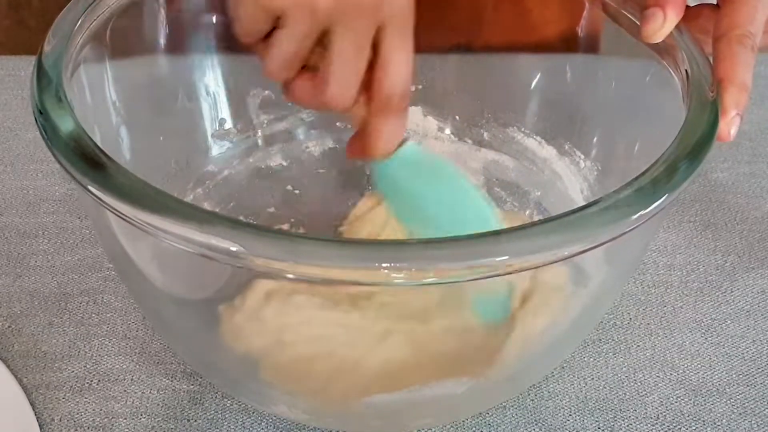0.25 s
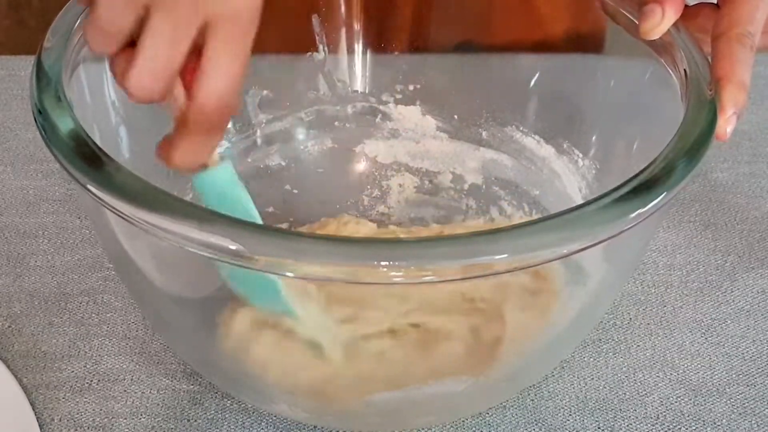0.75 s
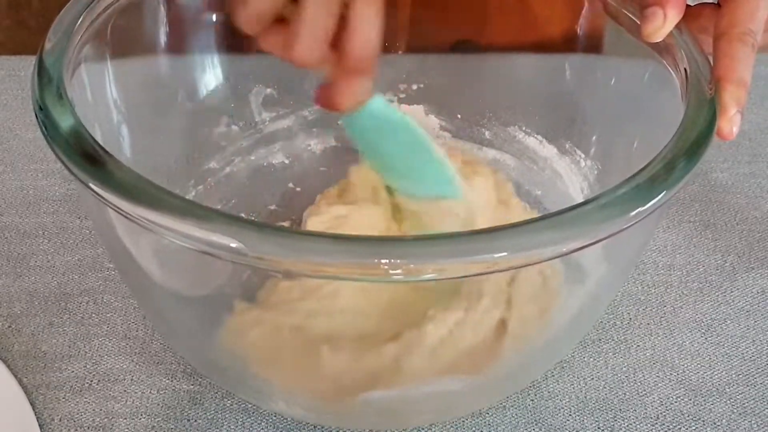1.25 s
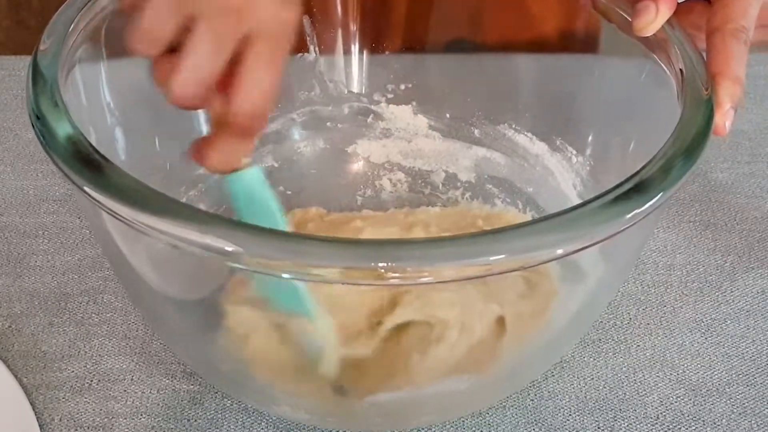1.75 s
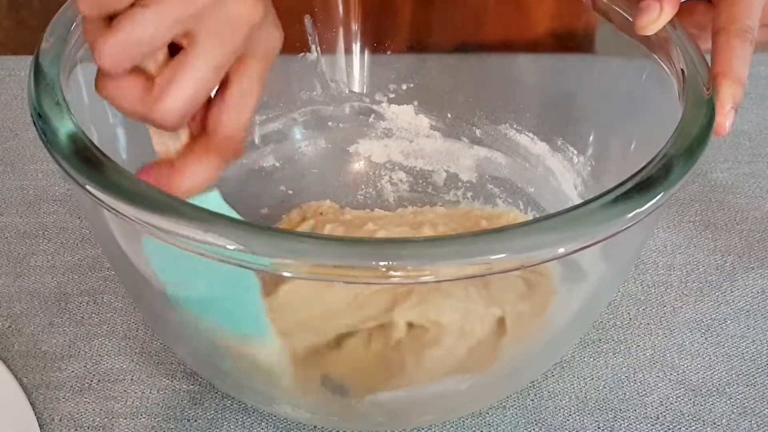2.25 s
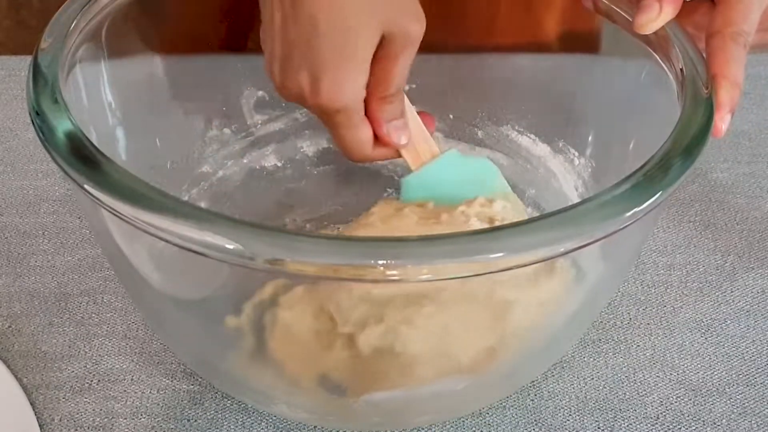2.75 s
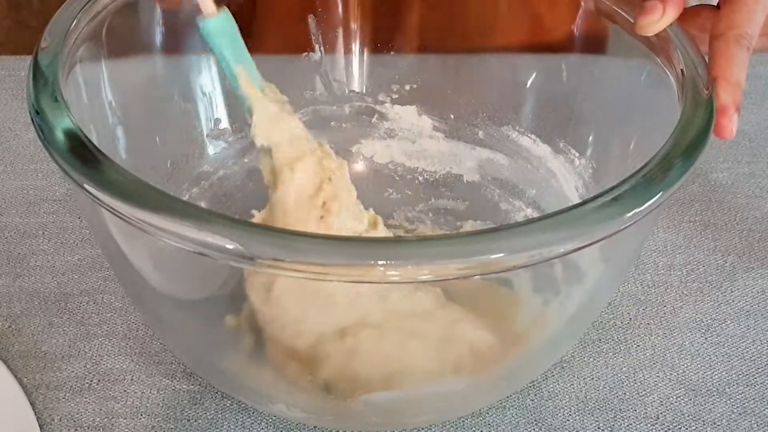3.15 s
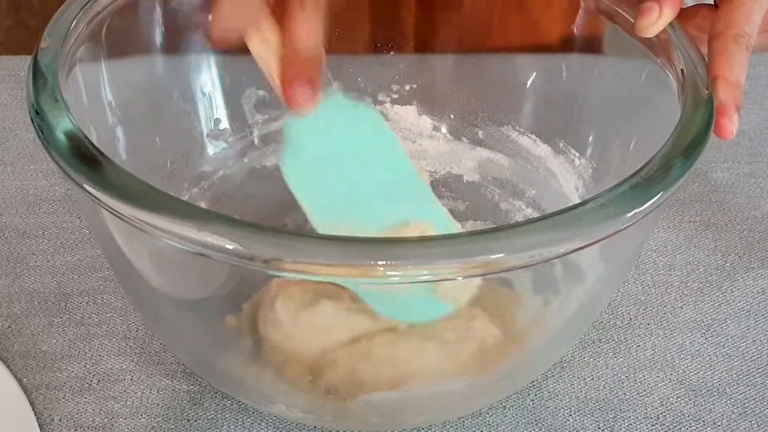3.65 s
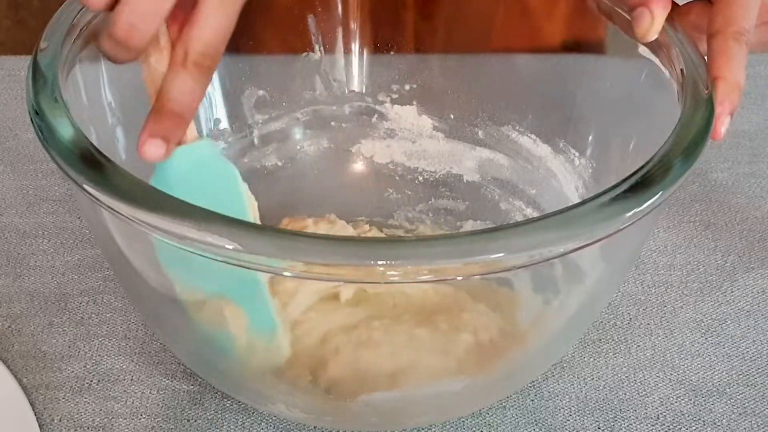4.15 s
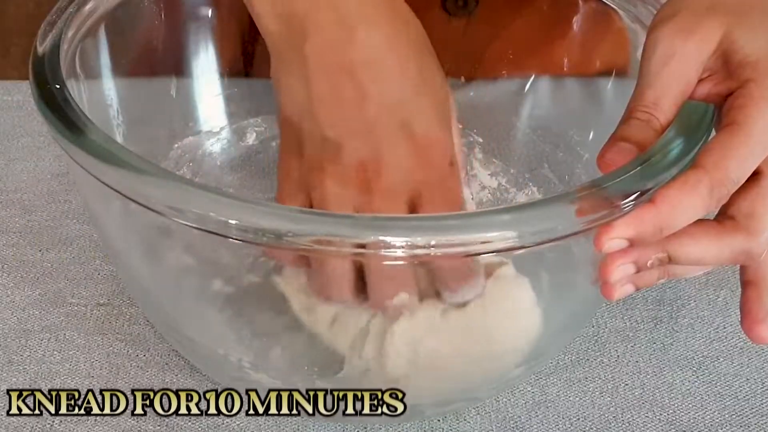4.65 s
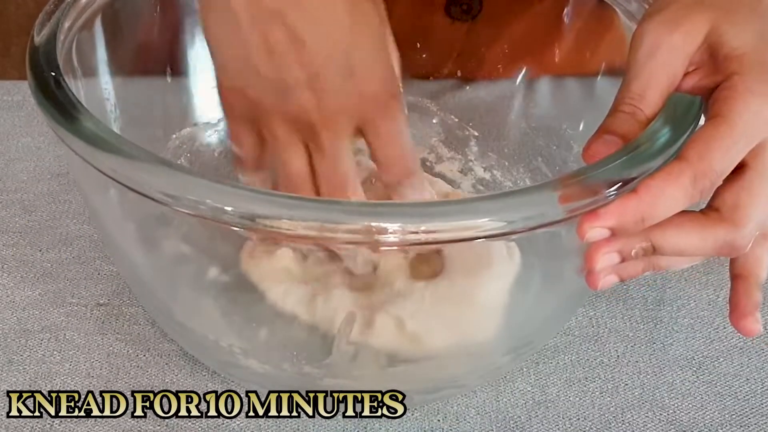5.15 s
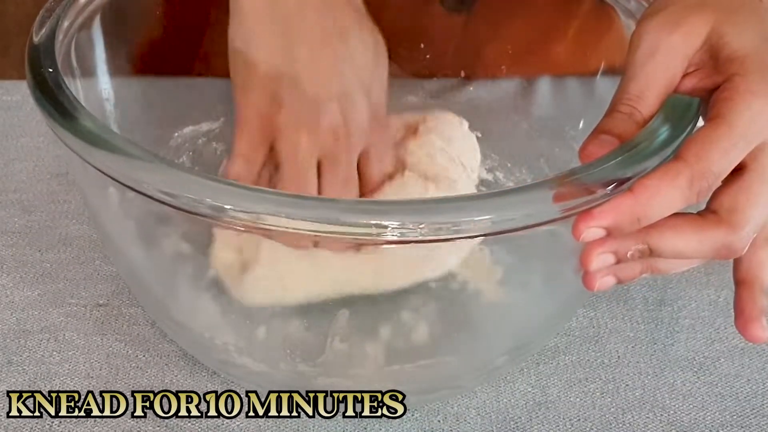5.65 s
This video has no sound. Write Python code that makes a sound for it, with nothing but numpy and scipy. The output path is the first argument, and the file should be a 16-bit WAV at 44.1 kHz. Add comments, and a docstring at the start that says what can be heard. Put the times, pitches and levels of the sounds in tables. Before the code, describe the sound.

Sticky dough crackles and snaps under a spatula in a glass bowl, with dull thumps, then a dry click and squelching hand kneading.

```python
"""Sticky dough is worked in a glass bowl on a cloth-covered table, first with a spatula, then by hand.
It crackles in clumps of tiny ruptures as it peels off the glass, squelches when pressed, and larger pockets snap.
Pushes thump the bowl and set the table ringing; one short, dry, full-band click comes just before the hand work.
The spatula taps through dough and twice touches bare glass, ringing the bowl's modes.
A small kitchen answers with decaying noise, over a quiet rumble and hiss."""
import sys
import numpy as np
from scipy import signal
from scipy.fft import rfft, irfft, next_fast_len
from scipy.io import wavfile

SR = 44100
rng = np.random.default_rng(int(sys.argv[2]) if len(sys.argv) > 2 else 0)


def store_pcm(level_fs):
    """Save levels as 16-bit WAV."""
    pcm = np.round(np.clip(level_fs, -1, 1) * 32767).astype(np.int16)
    wavfile.write(sys.argv[1], SR, np.atleast_2d(pcm).T)


N = 260190  # length in samples

# Colour of the room's rumble and hiss. Each row: frequency in Hz, relative density in dB per Hz.
BACKGROUND_COLOUR = [(25, -7.5), (40, -6), (55, 2.5), (85, 0.5), (135, -5), (180, -14), (300, -11.5),
                     (480, -16.5), (700, -21), (1600, -26.5), (3400, -30), (8000, -31.5), (16000, -31.5)]
BACKGROUND_DB = -50.5  # rms level before the microphone
# How alike left and right are in diffuse sound. Each row: frequency in Hz, correlation from -1 to 1.
STEREO_LIKENESS = [(50, 0.25), (150, 0.48), (300, 0.5), (600, 0.21), (1500, 0.09), (4000, 0), (16000, 0)]
# Stereo balance of diffuse sound. Each row: frequency in Hz, left against right in dB.
STEREO_BALANCE = [(50, -3), (150, -8.5), (400, -4), (1500, -1.5), (8000, -1), (14000, 0)]
KITCHEN_T60_S = 0.44
CUTOFF_HZ = 15900  # top of the recorded band

# Bare spatula on the glass. Each row: start in seconds, impulse level in dB, softness of contact in seconds.
BARE_KNOCKS = [(2.812, -39, 0.00005), (2.918, -33, 0.00049)]
# Glass bowl, damped by dough and hand. Each row: frequency in Hz, gain in dB, t60 in seconds.
BOWL_MODES = [(340, -7, 0.23), (414, 1.5, 0.31), (446, -4, 0.21), (497, -13, 0.22), (1107, -8, 0.66),
              (1550, -23, 0.19), (2110, -14, 0.14), (2840, -14, 0.25), (6020, -1, 0.11), (7930, -10, .15),
              (11800, -7, 0.1)]
DAMPED_S, DAMPING_DB_PER_S = 2.905, 500  # the blade settles on the glass and smothers its ring

# Spatula meeting the glass through dough. Each row: start in seconds, strength in dB.
CUSHIONED_TAPS = [(0.015, -23), (0.595, -26), (0.625, -33), (1.535, -22.5), (1.588, -26.5), (2.355, -26),
                  (2.814, -24.5), (2.919, -29.5), (3.731, -27.5)]
# Colour of a cushioned tap. Each row: frequency in Hz, relative density in dB per Hz.
TAP_COLOUR = [(200, -21.5), (450, 2.5), (720, -18), (990, -4.5), (1250, -14), (3000, -34)]

CLICK_S, CLICK_DB = 4.2152, -13  # the dry click before the hand work: time, impulse level
# Colour of the dry click. Each row: frequency in Hz, relative density in dB per Hz.
CLICK_COLOUR = [(150, 7), (500, 4), (1500, -7), (4000, -15), (9000, -22), (16000, -16)]

# Air pockets and threads of dough snapping. Each row: start in seconds, bright tick in dB, low pop in dB.
DOUGH_SNAPS = [(0.1334, -17.5, -29), (0.594, -37, -48), (0.6261, -27, -32), (0.6478, -21.5, -34),
               (0.963, -23, -34), (1.5362, -26.5, -24), (1.9126, -25, -41), (2.2598, -29.5, -36),
               (2.2915, -19, -27), (2.354, -13, -19.5), (2.4874, -15, -26), (2.804, -24, -27),
               (2.9024, -21, -46)]
# Colour of a snap's tick and fizz. Each row: frequency in Hz, relative density in dB per Hz.
TICK_COLOUR = [(1500, -18), (3300, -15), (4500, 2), (8000, 4.5), (13000, 7.5), (16000, 2)]
SPRAY_DB = -0.5  # impulse driving the fizz, against the one driving the tick

# Pushes that thump the table. Each row: start in seconds, force in dB, deep boom against the force in dB,
# hardness of contact in dB.
PUSHES = [(0.27, -13.5, -5.5, -2), (0.287, -12.5, -2, -0.5), (0.576, -17.5, -7, -5), (0.593, -10, -9, -1),
          (0.895, -9, -10.5, -2.5), (1.214, -7, -.5, 4.5), (1.534, .5, -4.5, 2), (1.817, -13.5, 6, -13),
          (1.841, 4.5, -27, 0.5), (2.352, -20, -8.5, -1.5), (2.487, -15.5, -19, -3.5),
          (2.741, -28.5, -3, 5), (2.809, -23, -6, 9.5), (4.195, -10.5, -10, 0.5), (4.215, -11.5, -19, 6.5),
          (4.588, -26.5, -9, 0), (4.82, -18, -11.5, -14), (5.422, -22, -2.5, -12)]
# Bowl bouncing on the cloth: frequency in Hz, t60 in seconds, left against right in dB.
CUSHION_MODE = (106.8, 0.053, -3.5)
# Deep boom behind a push: frequency in Hz, t60 in seconds, left against right in dB.
BOOM_MODE = (48, 0.43, -11.5)
# Table under the bowl. Each row: frequency in Hz, gain in dB, t60 in seconds, left against right in dB.
TABLE_MODES = [(61.4, -0.5, 0.21, 3), (129.9, 0.5, 0.31, -7.5), (210.7, -11, 0.22, 8),
               (237.5, -21, 0.43, -9), (292.7, -15, 0.3, -3), (361.3, -15.5, 0.41, 1)]
# Colour of the bowl's dull knock. Each row: frequency in Hz, relative density in dB per Hz.
KNOCK_COLOUR = [(120, 0), (190, -3), (240, 2), (310, -3), (390, -8), (490, -3), (650, -20), (1000, -31.5),
                (2000, -50)]
BOOM_DB, TABLE_DB, KNOCK_DB = -9, -20.5, -9.5  # how strongly a push excites each
KNOCK_FOLLOWS = 0.53  # the dough cushions the knock: dB per dB of force

# Strokes of the spatula. Each row: moment of greatest effort in seconds, peeling crackle in dB,
# share of the finest grains in dB, rise in seconds, release in seconds, wet squelch in dB.
SPATULA_STROKES = [(0.01, -48.5, -1, 0.09, 0.29, -61.5), (0.135, -44.5, -8, 0.0095, 0.093, -60),
                   (0.335, -54, -2.5, 0.11, 0.34, -64.5), (0.65, -53, -1.5, .12, 0.33, -67),
                   (0.975, -52, -1, .13, 0.36, -62.5), (1.293, -49, -2.5, .15, 0.16, -60.5),
                   (1.538, -48.5, -0.5, 0.02, 0.12, -51.5), (1.588, -50, -1.5, 0.14, 0.19, -53.5),
                   (1.78, -58, -4.5, 0.14, 0.052, -61), (1.915, -54, -1.5, 0.23, 0.24, -65),
                   (2.294, -46.5, -.5, 0.0045, 0.17, -56), (2.39, -39.5, -6.5, 0.096, 0.24, -53.5),
                   (2.505, -42.5, -7, .025, 0.37, -51), (2.725, -37.7, -4, 0.097, 0.13, -55.5),
                   (2.852, -48, -1, 0.089, 0.087, -60), (2.906, -44, -2.5, 0.0083, 0.054, -70),
                   (3.07, -49, -2, 0.14, 0.16, -68), (3.42, -66, -1.5, .4, 0.96, -81),
                   (3.775, -56.5, -2, 0.077, .18, -84)]
# Presses and pulls of the hand. Each row: moment of greatest effort in seconds, peeling crackle in dB,
# share of the finest grains in dB, rise in seconds, release in seconds, wet squelch in dB.
HAND_STROKES = [(4.218, -45.5, -1.5, .02, 0.42, -65), (4.325, -38, -4.5, .14, 0.13, -43),
                (4.603, -48, -2, 0.059, 0.096, -65), (4.815, -43, -2, 0.13, 0.2, -54.5),
                (4.902, -44, -4, 0.15, 0.24, -58.5), (5.13, -53, -2, 0.46, 0.29, -63),
                (5.44, -62.5, -3, .15, 0.15, -64), (5.615, -54, -1.5, 0.24, 0.13, -67),
                (5.722, -49.5, -1.5, 0.072, 0.22, -61), (5.89, -55, -2.5, 0.23, .2, -65)]
STROKE_RANGE_DB = 20  # change of crackle level over one rise or release time
RISE_CURVE = 1.32  # above 1: a stroke takes hold quickly and rounds off towards its top
SQUELCH_LAG_S, SQUELCH_SWING = 0.0046, 1.3  # the squelch follows a little later and swings further
# Colour of coarse ruptures. Each row: frequency in Hz, relative density in dB per Hz.
COARSE_COLOUR = [(1500, -14), (2500, -10.5), (3400, -6.5), (4300, -1.5), (5800, -3), (6800, -0.5),
                 (8200, 1), (9500, -8.5), (12000, -11)]
# Colour of the finest ruptures. Each row: frequency in Hz, relative density in dB per Hz.
FINE_COLOUR = [(4000, -54), (7000, -17), (8500, 1.5), (10500, 1.5), (13000, 3.5), (15500, -2.5)]
# Colour of wet squelches and low pops. Each row: frequency in Hz, relative density in dB per Hz.
SQUELCH_COLOUR = [(250, -13.5), (480, 6.5), (730, -8), (1000, 5.5), (1250, -5.5), (1600, 1), (2100, 1),
                  (2550, 1.5), (2930, -4), (3400, -9.5), (7000, -21.5)]
# Hollow between hand and glass. Each row: frequency in Hz, gain in dB, t60 in seconds.
HOLLOW_MODES = [(503, 3, 0.042), (1030, -2, 0.021), (1630, -4, 0.011), (2952, 5, 0.053), (4830, 0, 0.022)]


def from_db(db):
    """Decibels to gain."""
    return 10 ** (np.asarray(db) / 20)


def rms_one(x):
    """Scale to rms 1."""
    return x / np.sqrt(np.mean(x ** 2) + 1e-20)


def at_hz(points, hz):
    """Read a table on a log-frequency axis."""
    f, value = np.transpose(points)
    return np.interp(np.log(np.maximum(hz, 1)), np.log(f), value)


def panned(pan_db):
    """Left and right gains for a level difference; positive leans left."""
    return from_db(np.array([[pan_db], [-pan_db]]) / 2)


def drift(rate):
    """Slow chance of rms 1, with a new random target `rate` times a second."""
    knots = np.arange(N) / SR * rate
    return rms_one(np.interp(knots, np.arange(N), rng.standard_normal(N)))


def clicks(times, level_db):
    """One impulse for each event."""
    out = np.zeros(N)
    index = np.clip(np.round(times * SR).astype(int), 0, N - 1)
    out[index] = from_db(level_db)
    return out


def fade(x, time_s):
    """Spread each impulse into an exponential decay of the same area."""
    r = np.exp(-1 / (time_s * SR))
    return signal.lfilter([1 - r], [1, -r], x + 1e-18)


def soften(x, contact_s):
    """A soft contact spreads each impulse into a smooth push."""
    return fade(fade(x, contact_s), contact_s)


def ring(x, hz, t60):
    """A two-pole resonator: a unit click starts a decaying sine of initial height 1."""
    r = from_db(-60 / (t60 * SR))
    w = 2 * np.pi * hz / SR
    return signal.lfilter([0, np.sin(w)], [1, -2 * r * np.cos(w), r * r], x + 1e-18)


def swell(x, mode, rise_t60):
    """A resonance that builds up gradually: a faster-dying copy cancels its onset, then it is panned."""
    hz, t60, pan_db = mode
    return (ring(x, hz, t60) - ring(x, hz, rise_t60)) * panned(pan_db)


def colour(x, spectrum):
    """Causal (minimum-phase) filter with the given spectrum and a power gain of 1."""
    size = 8192
    hz = np.arange(size // 2 + 1) * SR / size
    gain = rms_one(from_db(at_hz(spectrum, hz)))
    # fold the cepstrum forward in time to get minimum phase
    cepstrum = irfft(np.log(gain))
    cepstrum[1:size // 2] *= 2
    cepstrum[size // 2 + 1:] = 0
    impulse = irfft(np.exp(rfft(cepstrum)))
    return signal.fftconvolve(np.atleast_2d(x), impulse[None], axes=1)[:, :N]


def diffuse(size):
    """Stereo noise arriving from all round: partly alike in the bass, unrelated in the treble."""
    padded = next_fast_len(size, real=True)
    hz = np.arange(padded // 2 + 1) * SR / padded
    mid, side = rfft(rng.standard_normal((2, padded)))
    alike = np.clip(at_hz(STEREO_LIKENESS, hz), -1, 1)
    sign = np.array([[1], [-1]])  # left, right
    both = np.sqrt(1 + alike) * mid + sign * np.sqrt(1 - alike) * side
    balance = from_db(sign * at_hz(STEREO_BALANCE, hz) / 2)
    return rms_one(irfft(both * balance, padded)[:, :size])


def kitchen(x, direct_db, early_db, early_s, tail_db):
    """Direct sound plus early reflections and room tail, both fresh noise carrying the decaying energy."""
    early = from_db(early_db) ** 2 * fade(x ** 2, early_s)
    tail = from_db(tail_db) ** 2 * fade(x ** 2, KITCHEN_T60_S / np.log(1e6))  # t60 to energy time constant
    return from_db(direct_db) * x + np.sqrt(early + tail) * diffuse(N)


def bowl(x):
    """The glass rings in its modes."""
    return sum(from_db(db) * ring(x, hz, t60) for hz, db, t60 in BOWL_MODES)


def background():
    """The rumble and hiss of the room: steady diffuse noise, strongest in the bass."""
    return from_db(BACKGROUND_DB) * rms_one(colour(diffuse(N), BACKGROUND_COLOUR))


def knocks():
    """The bare spatula rings the glass until the blade settles; a softer contact drives high modes less."""
    blows = sum(soften(clicks(np.array([s]), db), contact_s) for s, db, contact_s in BARE_KNOCKS)
    since_damped = np.clip(np.arange(N) / SR - DAMPED_S, 0, .2)
    smother = from_db(-DAMPING_DB_PER_S * since_damped)
    return bowl(blows) * smother * panned(-5.0)


def taps():
    """Cushioned blows on the glass die at once, leaving only the room."""
    s, strength_db = np.transpose(CUSHIONED_TAPS)
    blows = kitchen(clicks(s, strength_db), direct_db=0, early_db=-14, early_s=0.0035, tail_db=3)
    return colour(blows, TAP_COLOUR)


def click():
    """One short, dry, full-band click just before the hand work: a coloured impulse with little room."""
    impulse = clicks(np.array([CLICK_S]), CLICK_DB)
    in_room = kitchen(impulse, direct_db=-1, early_db=-11, early_s=.001, tail_db=-23)
    return colour(in_room, CLICK_COLOUR) * panned(-2)


def snaps():
    """Larger pockets burst with a bright tick and a lower pop, then fizz briefly."""
    s, tick_db, pop_db = np.transpose(DOUGH_SNAPS)
    tick = kitchen(clicks(s, tick_db), direct_db=-3, early_db=0, early_s=.0009, tail_db=-4)
    spray = kitchen(clicks(s, tick_db + SPRAY_DB), direct_db=-30, early_db=5, early_s=0.019, tail_db=-16)
    pop = kitchen(clicks(s, pop_db), direct_db=-8.0, early_db=-1.5, early_s=0.0037, tail_db=-2)
    return colour(tick + spray, TICK_COLOUR) + colour(pop, SQUELCH_COLOUR)


def thuds():
    """The bowl bounces on the cloth and knocks dully; the table rings and a deep boom swells behind."""
    s, force_db, boom_db, hard_db = np.transpose(PUSHES)
    bounce = swell(soften(clicks(s, force_db), contact_s=0.0011), CUSHION_MODE, rise_t60=0.038)

    push = soften(clicks(s, TABLE_DB + force_db + hard_db), contact_s=0.00084)
    table = sum(from_db(db) * swell(push, (hz, t60, pan), rise_t60=0.087)
                for hz, db, t60, pan in TABLE_MODES)

    deep_push = soften(clicks(s, BOOM_DB + force_db + boom_db), contact_s=0.0016)
    boom = swell(deep_push, BOOM_MODE, rise_t60=0.17)

    hit = clicks(s, KNOCK_DB + KNOCK_FOLLOWS * force_db + hard_db)
    knock = kitchen(hit, direct_db=-14, early_db=-15, early_s=0.013, tail_db=0.0)
    return boom - bounce - table + colour(knock, KNOCK_COLOUR)  # the bowl first moves away


def controls(strokes, start_s):
    """After start_s, strokes swell and let go: crackle level, fine-grain share and squelch level in dB."""
    t = np.arange(N) / SR
    peel = fine = squelch = 1e-10  # powers, with a floor for the logarithm
    for s, peel_db, fine_db, rise_s, release_s, squelch_db in strokes:
        before = (np.maximum(s - t, 0) / rise_s) ** RISE_CURVE
        after = np.maximum(t - s, 0) / release_s
        away = np.minimum(before + after, 10)
        effort = (t > start_s) * from_db(-STROKE_RANGE_DB * away) ** 2
        peel = peel + effort * from_db(peel_db) ** 2
        fine = fine + effort * from_db(peel_db + fine_db) ** 2
        squelch = squelch + effort ** SQUELCH_SWING * from_db(squelch_db) ** 2
    late_squelch = np.interp(t - SQUELCH_LAG_S, t, squelch)
    return 10 * np.log10([peel, fine / peel, late_squelch])


def grains(level_db, per_s, spread_db, clump_db):
    """Tiny ruptures of uneven size, in clumps; per_s holds at -50 dB and louder work is denser."""
    rate = per_s * from_db((level_db + 50) / 2)
    born = rng.random(N) < rate / SR
    sizes = from_db(spread_db * np.minimum(rng.exponential(1, N), 4)) * rng.choice([-1, 1], N)
    clumps = from_db(clump_db * drift(110))
    # dividing by sqrt(rate) leaves loudness to level_db alone
    return from_db(level_db) * rms_one(born * sizes * clumps / np.sqrt(rate))


def crackle(peel, fine_db):
    """Dough peeling off the glass: coarse and fine ruptures, which also make the bowl sing faintly."""
    share = np.clip(from_db(fine_db) ** 2, .05, .9)  # fine part of the power
    sizes = [(np.sqrt(1 - share), COARSE_COLOUR), (np.sqrt(share), FINE_COLOUR)]
    heard = 0
    for part, tone in sizes:
        ruptures = kitchen(peel * part, direct_db=-6.0, early_db=1.5, early_s=0.011, tail_db=-10.5)
        heard = heard + colour(ruptures, tone)
    return heard + from_db(-46) * bowl(heard)


def spatula_dough():
    """The spatula tears the dough in rough clumps of ruptures, with a wet squelch beneath."""
    peel_db, fine_db, squelch_db = controls(SPATULA_STROKES, start_s=0)
    torn = crackle(grains(peel_db, per_s=1600, spread_db=4.3, clump_db=2), fine_db)
    wet = grains(squelch_db, per_s=1000, spread_db=1.5, clump_db=3)
    squelch = kitchen(wet, direct_db=-4.5, early_db=-0.5, early_s=0.0064, tail_db=-8.0)
    return torn + colour(squelch, SQUELCH_COLOUR)


def hand_dough():
    """The hand slides more smoothly, in denser grains, and squeezes air through a resonant hollow."""
    peel_db, fine_db, squelch_db = controls(HAND_STROKES, start_s=CLICK_S)
    kneaded = crackle(grains(peel_db, per_s=3600, spread_db=-1.5, clump_db=1.9), fine_db)
    wet = grains(squelch_db, per_s=3500, spread_db=2.0, clump_db=2.0)
    air = kitchen(wet, direct_db=-10, early_db=1, early_s=0.019, tail_db=-26)
    sealed = np.clip((squelch_db + 67.5) / 12, .2, 1)  # only a firm press closes the hollow
    hollow = sum(from_db(db) * ring(air * sealed, hz, t60) / (t60 * SR) for hz, db, t60 in HOLLOW_MODES)
    open_air = colour(air * (1 - 0.3 * sealed), SQUELCH_COLOUR)
    return kneaded + from_db(38.5) * hollow + open_air


def glass_wall(x, gain, delay_s, travel):
    """Two reflections off the bowl per channel; their delays wander, so the colour keeps shifting."""
    n = np.arange(N)
    out = x.copy()
    for channel in range(2):
        for path in range(1, 3):
            lag = delay_s * path * SR * np.exp(travel * drift(2))
            out[channel] += gain * np.interp(n - lag, n, x[channel])
    return out / np.sqrt(1 + 2 * gain ** 2)


def dough():
    """Spatula work and kneading are both heard with the reflections of the glass wall."""
    return glass_wall(spatula_dough() + hand_dough(), gain=0.3, delay_s=0.000706, travel=0.197)


def scene():
    """Bowl and dough over the rumble and hiss of the room."""
    return background() + knocks() + taps() + click() + snaps() + thuds() + dough()


def record(dry):
    """The microphone loses the deepest bass; the top is cut steeply."""
    thin = signal.sosfilt(signal.butter(4, 33, "high", fs=SR, output="sos"), dry)
    return signal.sosfilt(signal.ellip(12, .1, 90, CUTOFF_HZ, fs=SR, output="sos"), thin)


dry = scene()
out = record(dry)
store_pcm(out)
```